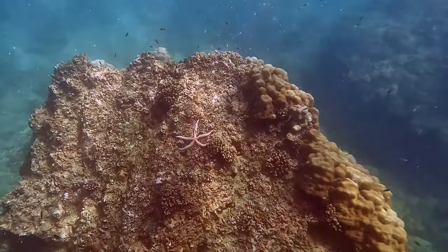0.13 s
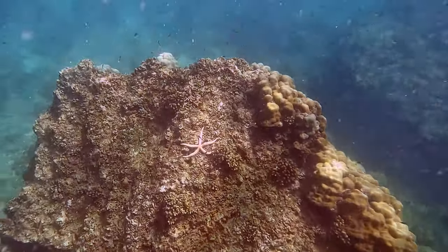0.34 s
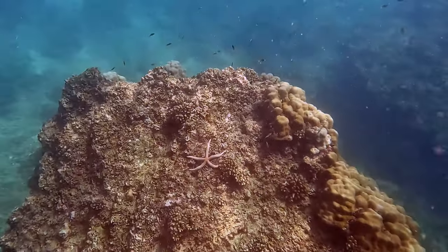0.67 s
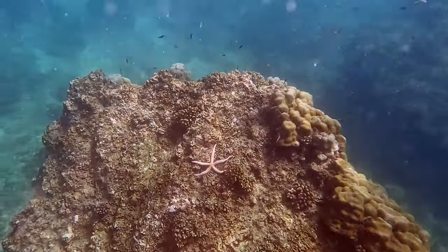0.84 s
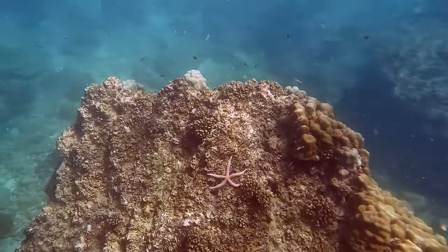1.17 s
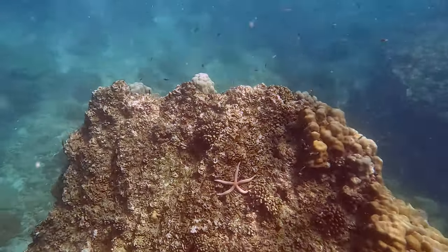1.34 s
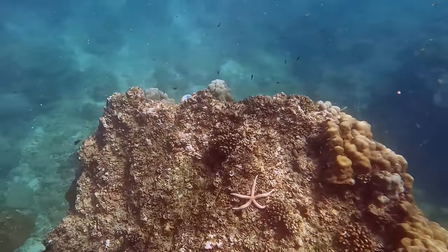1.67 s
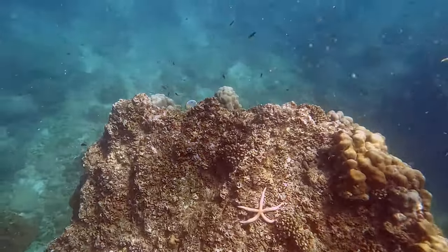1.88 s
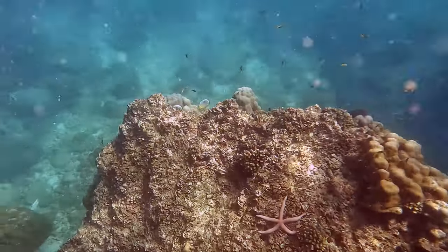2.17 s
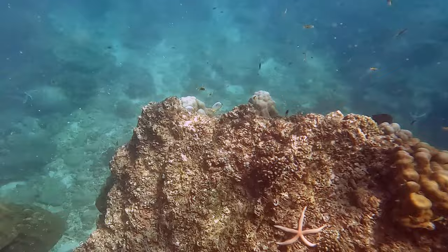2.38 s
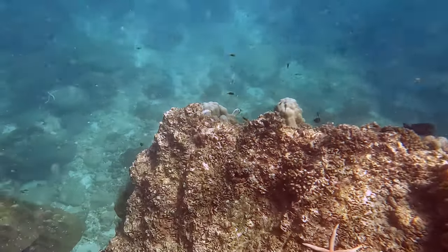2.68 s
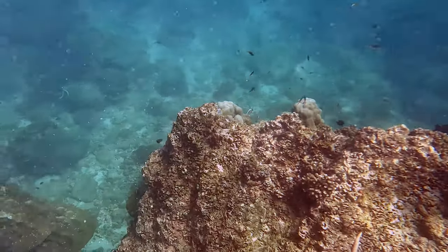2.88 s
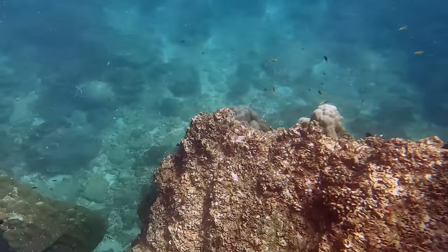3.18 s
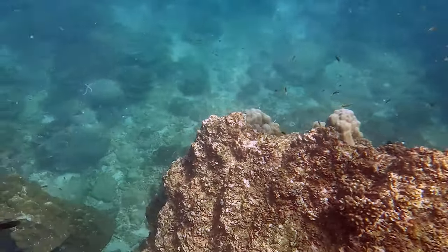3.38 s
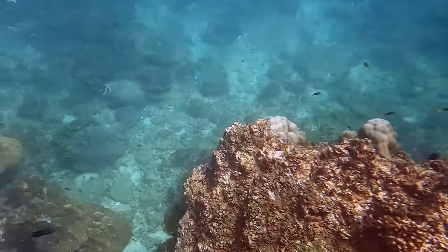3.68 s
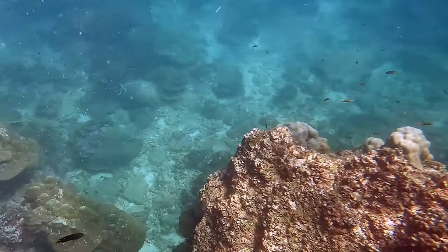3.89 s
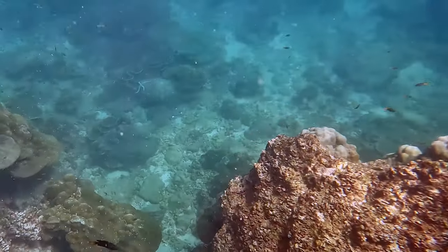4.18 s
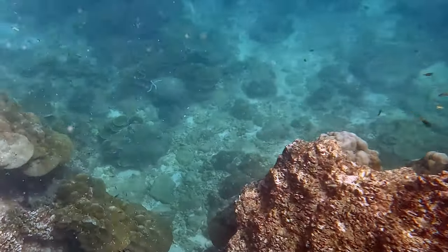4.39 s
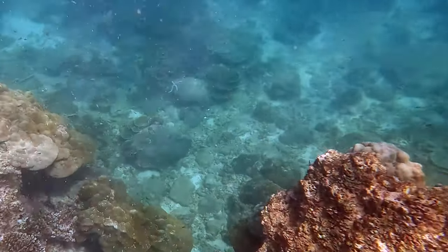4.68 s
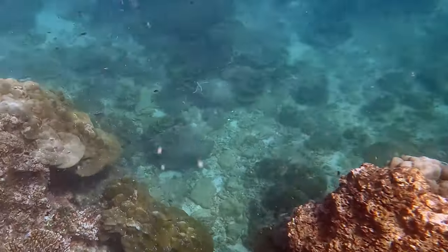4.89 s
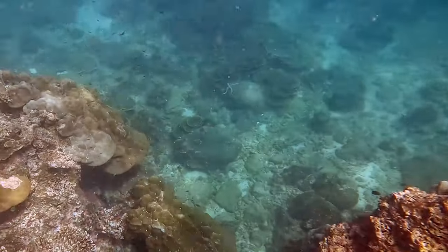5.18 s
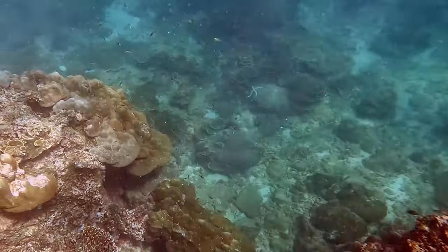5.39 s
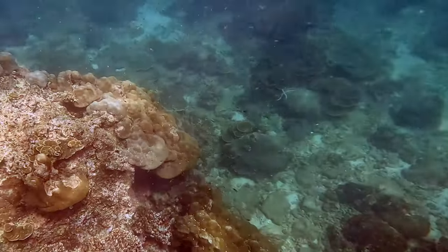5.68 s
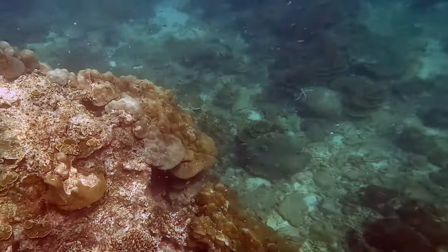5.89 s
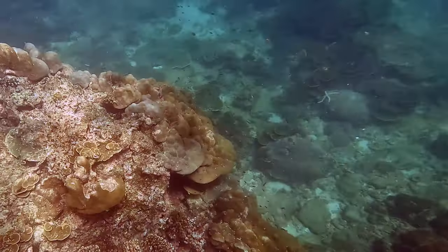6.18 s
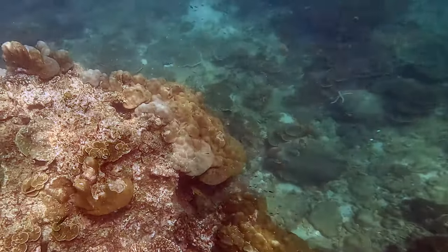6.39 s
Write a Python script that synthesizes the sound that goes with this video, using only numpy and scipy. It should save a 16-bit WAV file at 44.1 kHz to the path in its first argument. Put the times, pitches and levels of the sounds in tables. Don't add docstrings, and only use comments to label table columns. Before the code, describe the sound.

Beneath the surface over a shallow reef, a low muffled wash of water presses and gurgles unevenly. Trapped air pockets give short, hollow bloops. Across everything runs a fine, continuous crackle of distant snapping shrimp, with irregular sharper clicks close to the microphone, the strongest around two, four and just after six seconds. The sealed housing makes the water boxy and dull.

```python
import sys
import numpy as np
from scipy import signal
from scipy.fft import rfft, irfft
from scipy.io import wavfile
from scipy.ndimage import uniform_filter1d, minimum_filter1d

SR = 44100
rng = np.random.default_rng(int(sys.argv[2]) if len(sys.argv) > 2 else 0)


def unload_wav(signal):
    wavfile.write(
        sys.argv[1],
        SR,
        np.round(np.clip(np.atleast_2d(signal).T, -1, 1) * 32767).astype(np.int16),
    )


def ratio_of_db(decibels):
    return 10 ** (np.asarray(decibels, float) / 20)


N = 288414

# (frequency [Hz], colour [dB])
SHELL_LOW = [(9, -23), (18, 3.5), (39, -8.5), (56, -14.5), (110, -47), (165, -23.5), (250, -15), (290, -18),
             (351, -25), (478, -7.5), (550, -20), (606, -21), (670, -36.5)]
DEEP_THUD_DB, FULL_THUD_DB, THIN_THUD_DB = -1.5, -9.5, -16.5


def evened(x):
    return x / np.sqrt(np.mean(x ** 2) + 1e-20)


def levelled(x, size):
    return x / np.sqrt(uniform_filter1d(x ** 2, size) + 1e-20)


def lumpy(size):
    return evened(uniform_filter1d(rng.standard_normal(N), size))


def read_curve(points, hz):
    point_hz, value = np.transpose(points)
    return np.interp(np.log(hz + 1), np.log(point_hz + 1), value)


def follow(rows):
    seconds, db = np.transpose(rows)
    return ratio_of_db(np.interp(np.arange(N) / SR, seconds, db))


def add(mix, s, sound):
    part = mix[max(round(s * SR), 0):][:len(sound)]
    part += sound[:len(part)]


def scatter(sounds, per_s, scatter_db, cap):
    out = np.zeros(N)
    for when, which, size in rng.random((round(per_s * N / SR), 3)):
        gain = ratio_of_db(scatter_db * min(-np.log(size), cap))
        add(out, when * N / SR, gain * sounds[int(which * len(sounds))])
    return out


def band(x, lo_hz, hi_hz, order=2):
    return signal.sosfilt(signal.butter(order, [lo_hz, hi_hz], "bandpass", fs=SR, output="sos"), x)


def shaped(x, gain):
    return irfft(rfft(x) * gain(np.fft.rfftfreq(x.shape[-1], 1 / SR)), x.shape[-1])


def through_shell(x, ring):
    return signal.oaconvolve(x, ring)[:N]


def shell_ring(size=4096):
    # (frequency [Hz], colour [dB])
    shell_high = [(380, -47), (650, 1.5), (1040, -3), (1440, -3), (2100, -9.5), (2650, -3.5), (4000, -6),
                  (5870, 1), (7500, -1), (8100, -15), (9300, -16.5), (9750, -23), (12600, -21.5),
                  (13300, -31.5), (15600, -36)]
    # (frequency [Hz], width [Hz], depth [dB])
    notches = [(700, 50, -14), (880, 70, -8), (1160, 80, -15), (2380, 130, -5), (2870, 170, -7),
               (4700, 420, -11), (5350, 220, -6), (6650, 400, -5)]
    hz = abs(np.fft.fftfreq(size, 1 / SR))
    db = read_curve(shell_high, hz)
    for notch_hz, width_hz, depth_db in notches:
        db = db + depth_db / (1 + (2 * (hz - notch_hz) / width_hz) ** 2)
    log_gain = np.log(ratio_of_db(np.maximum(db, -100)))
    return np.fft.ifft(np.exp(np.conj(signal.hilbert(log_gain)))).real[:size // 2]


def surge():
    # (time [s], level [dB])
    swell = [(0.0, -32), (0.84, -33), (1.6, -33), (1.77, -26.5), (1.95, -39), (2.09, -24.5), (2.6, -26.5),
             (2.68, -32.5), (3.57, -37), (3.86, -29.5), (4.35, -38.5), (4.68, -34.5), (4.81, -42),
             (4.84, -32), (5.25, -35.5), (5.3, -30.5), (6.39, -32), (6.54, -29.5)]
    push = shaped(rng.standard_normal(N), lambda hz: ratio_of_db(read_curve(SHELL_LOW, hz)) * (hz < 130))
    lumps = ratio_of_db(0.89 * lumpy(4000))
    return follow(swell) * lumps * levelled(push, size=7000)


def pocket(hz, ms, glide, rise_ms=2.77, tail_db=-11):
    t = np.arange(round(SR * ms * .004)) / SR * 1000
    after = ratio_of_db(tail_db) * np.cos(np.pi / 2 * t / t[-1]) ** 2
    shape = (1 - np.exp(-(t / rise_ms) ** 2)) * (np.exp(-(t / ms) ** 3) + after)
    return shape / shape.max() * np.sin(2 * np.pi * hz * (t + glide * t ** 2 / ms) / 1000)


def pocket_choir(pitches_hz, least_cycles, most_cycles, glide):
    cycles = rng.uniform(least_cycles, most_cycles, len(pitches_hz))
    return [pocket(hz, 1000 * c / hz, glide) for hz, c in zip(pitches_hz, cycles)]


def churn(wash_db=-8, count=40):
    # (time [s], level [dB])
    stirring = [(0.0, -40.5), (0.13, -38), (0.38, -37.5), (0.49, -42), (0.8, -44.5), (1.08, -43.5),
                (1.36, -46.5), (1.48, -39), (2.3, -40.5), (2.75, -41), (3.19, -43.5), (4.06, -36.5),
                (4.46, -43), (4.86, -38), (5.5, -40), (5.94, -42.5), (6.21, -40), (6.54, -42.5)]
    deep_db, low_db, upper_db, lumps_db = -11, -7.5, -3.5, 2.5
    tones = pocket_choir(np.linspace(120, 650, count), 1.46, 8.8, glide=0.027)
    gurgle = scatter([x / np.linalg.norm(x) for x in tones], per_s=220, scatter_db=-3.5, cap=0.79)
    wash = band(rng.standard_normal(N), 154, 625)
    stirred = evened(gurgle) + ratio_of_db(wash_db) * evened(wash)
    water = shaped(stirred, lambda hz: ratio_of_db(read_curve(SHELL_LOW, hz)) * (hz > 95))
    low = shaped(water, lambda hz: 1 / (1 + (hz / 350) ** 12))
    deep = shaped(water, lambda hz: 1 / (1 + (hz / 225) ** 12))
    shared, own = uniform_filter1d(rng.standard_normal((2, N)), size=3000)
    layers = [(deep, deep_db, shared), (low - deep, low_db, shared), (water - low, upper_db, shared + own)]
    out = np.zeros(N)
    for layer, db, lumps in layers:
        out += ratio_of_db(db + lumps_db * evened(lumps)) * levelled(layer, size=3000)
    return follow(stirring) * out


def fizz(ring, level_db=-62, count=30):
    tones = pocket_choir(np.geomspace(720, 2000, count), 8.6, 29.5, glide=0.031)
    chirps = scatter(tones, per_s=60, scatter_db=6.0, cap=1.76)
    return ratio_of_db(level_db) * evened(through_shell(chirps, ring))


def draws(count):
    return np.stack([rng.random((count, 900)), rng.standard_normal((count, 900))], 1)


def spike(draw, tail_db=-33):
    place, noise = draw
    ms = np.arange(900) / SR * 1000
    bounces = .75 * (place < .05) * np.sign(noise) * np.exp(-(ms / 1.6) ** 2) * (ms > .5)
    bounces[[0, 14]] = -.3, 1
    return bounces + ratio_of_db(tail_db) * noise * np.exp(-ms / 9) * np.minimum(ms, 1)


def crackle(ring, count=40):
    crackle_db, hiss_db = -50.5, -50
    ticks = []
    for draw, hz in zip(draws(count), np.geomspace(1300, 11000, count)):
        tint = band(spike(draw, -29.5)[::rng.choice([-1, 1])], hz * 0.82, hz * 1.14)
        tick = spike(draw) * .12 + tint
        ticks.append(tick * (hz / 5000) ** 0.32 / np.linalg.norm(tick))
    far = through_shell(scatter(ticks, per_s=450, scatter_db=6.0, cap=2.46), ring)
    flicker = ratio_of_db(3.66 * lumpy(500))
    hiss = through_shell(flicker * rng.standard_normal(N), ring)
    return ratio_of_db(crackle_db) * evened(far) + ratio_of_db(hiss_db) * evened(hiss)


def bubbles(rows):
    out = np.zeros(N)
    for (s, hz, db, ms), glide in zip(rows, rng.normal(0.0012, 0.0105, len(rows))):
        add(out, s - .002, ratio_of_db(db) * pocket(hz, ms, glide, tail_db=-11 if hz < 700 else -24))
    return out


def clear_pockets():
    # (time [s], pitch [Hz], peak [dB], length [ms])
    large = [(0.001, 246, -28, 55), (0.181, 256, -26.5, 28), (0.3, 175, -32, 32), (0.328, 277, -31, 48),
             (0.456, 255, -28.5, 23), (0.516, 255, -31, 27), (1.441, 176.4, -33.5, 43),
             (1.625, 179, -31.5, 26), (1.794, 328, -27, 3.5), (2.275, 224, -30, 16), (2.576, 244, -29, 20),
             (2.655, 266, -28.5, 19), (2.71, 255, -28.5, 20), (2.951, 245, -30.5, 15),
             (3.195, 247, -28.5, 13), (3.477, 311, -31, 31), (3.581, 194, -29, 17), (4.038, 300, -37, 18),
             (4.078, 276, -20, 30), (4.304, 273, -30.5, 12), (4.644, 370, -23.5, 3.4),
             (4.759, 204, -28, 30), (5.197, 228, -26.5, 20), (5.321, 242, -31.5, 38), (5.359, 242, -37, 29),
             (5.457, 229, -25, 18.5), (5.537, 243, -25.5, 29), (5.602, 182, -24, 28), (5.605, 290, -27, 40),
             (6.166, 218, -31.5, 20)]
    middle = [(0.115, 411, -28, 7.6), (0.427, 530, -27.5, 9.1), (0.687, 548, -33, 14.6),
              (0.99, 564, -38, 20), (1.085, 570, -35.5, 16.5), (2.451, 502, -35, 18),
              (3.635, 489, -33.5, 23), (1.421, 482, -26, 19), (1.65, 563, -25, 12), (1.69, 426, -32, 8.7),
              (1.74, 487, -28.5, 13), (1.941, 486, -18, 32.4), (2.168, 465, -24, 23), (2.566, 492, -29, 38),
              (2.835, 451, -31.5, 18), (3.034, 476, -25.5, 17.4), (3.799, 458, -22, 14.4),
              (4.076, 478, -30.5, 46), (4.09, 376, -30.5, 43), (4.145, 478, -31, 35),
              (4.694, 506, -29.5, 22), (4.908, 470, -27, 9.6), (4.923, 474, -34.5, 103),
              (5.03, 432, -26, 9.4), (5.084, 426, -28.5, 36), (5.209, 465.6, -28, 46),
              (5.264, 495, -30.5, 51), (5.32, 453, -32, 22), (5.368, 565, -22.5, 9.2),
              (6.523, 447, -28, 16)]
    small = [(0.045, 795, -41.5, 10.4), (0.69, 1025, -47, 11), (1.246, 1050, -47, 19),
             (1.41, 1760, -41.5, 9.6), (1.598, 1250, -44, 14), (1.808, 758, -45.5, 19),
             (2.39, 1450, -42, 14), (2.935, 1070, -45.5, 24), (3.594, 744, -41, 14), (3.81, 800, -34, 2.8),
             (4.14, 1580, -44, 19), (4.691, 890, -41, 5), (5.03, 1033, -46, 25), (5.353, 810, -35, 5.3),
             (1.952, 1256, -37.5, 15), (4.438, 1265, -39, 14), (5.319, 995, -33.5, 12.6),
             (6.151, 986, -36, 15), (6.292, 1276, -45, 43)]
    return bubbles([*large, *middle, *small])


def favoured(x, lo_hz, place, boost=2.07, sharpness=7):
    return x + boost * signal.lfilter(*signal.iirpeak(lo_hz * 1.654 ** (0.13 + place), sharpness, SR), x)


def snaps(ring, *kinds):
    regions_hz = [1000, 2380, 4650, 8300, 16000]
    faint_edge_db = -18.5
    parts = [band(ring, lo, hi, order=3)[:700] for lo, hi in zip(regions_hz, regions_hz[1:])]
    out = np.zeros(N)
    for rows, thud_db in kinds:
        for (s, energy_db, body_db, *edge_db), draw in zip(rows, draws(len(rows))):
            top_db = edge_db[0] if edge_db else faint_edge_db
            shares_db = energy_db - 2.5 + np.array([body_db + thud_db, body_db, 0, top_db])
            snap = 0
            for k, (part, lo_hz, db) in enumerate(zip(parts, regions_hz, shares_db)):
                rung = np.convolve(spike(np.roll(draw, 200 * k, axis=1)), part)
                rung = favoured(rung, lo_hz, place=draw[0, k])
                snap = snap + ratio_of_db(db) * rung / np.linalg.norm(rung[:150])
            add(out, s - .0005, snap)
    return out


def faint_snaps(ring):
    # (time [s], energy [dB], body [dB re energy])
    deep = [(0.018, -14, -9), (0.6453, -15.5, -7), (0.6897, -16, -15), (0.8208, -15, -10),
            (1.1893, -16, -6.5), (1.5045, -19.5, 1), (1.5822, -15, -10), (1.7817, -16.5, -3.5),
            (1.8017, -20, 0), (1.9131, -21, -8), (1.991, -15, -8), (2.0889, -17, -6), (2.3136, -15, -5),
            (2.6941, -21.5, -0.5), (3.909, -22, 2), (2.8235, -13.5, -8), (2.9718, -14.5, -5),
            (3.4167, -16, -3), (5.581, -18, -7), (3.488, -11.5, -11), (4.1285, -23, 4), (4.8685, -15, -13),
            (5.0145, -18.5, -3), (5.3331, -20.5, 1), (5.5583, -18, 0), (5.7087, -24.5, 6.5),
            (6.1168, -18, -1), (6.1633, -14.5, -5.5), (5.7983, -15, -10), (5.9086, -14, -6),
            (5.9805, -10.5, -24), (6.5002, -14, -13), (4.8185, -22, 5), (0.7131, -25, 1), (5.7553, -21, -2)]
    thin = [(0.7634, -20, -12), (0.3263, -12.5, -5), (0.3469, -15, -3), (2.0223, -15.5, -11),
            (0.428, -21, -3), (0.5844, -19, -2), (0.6608, -23.5, 3), (0.836, -14, -14), (0.9706, -19, -17),
            (1.2197, -15, -9), (1.3362, -21, -22), (1.4349, -16, -0.5), (1.714, -14, -20),
            (2.1482, -16, -12), (1.827, -15, -10), (1.852, -16.5, -4), (1.93, -22, -2), (2.1291, -21, 5),
            (2.175, -18, -6), (2.2938, -20, -18), (2.4512, -14, -11), (6.3055, -18, -10),
            (2.5478, -16, -24), (2.605, -20, -19), (2.6128, -11.5, -9), (2.6276, -18.5, 4.5),
            (2.9915, -27.5, -11), (3.0366, -15, -2), (3.1229, -20, -7), (3.1481, -17, -1.5),
            (3.1959, -11, -19), (3.4316, -13, -6), (3.4594, -17, -1), (3.4917, -19, -16),
            (3.6041, -13.5, -6), (3.6266, -17, -3), (3.7032, -14.5, -13), (3.7325, -14, -11),
            (3.7401, -19, -18), (3.8142, -11, -14), (3.8529, -16, -4), (4.0156, -13, -14.5),
            (4.2714, -19, -8), (4.449, -15.5, -8), (4.4822, -17, 1), (4.5515, -16.5, -7), (4.709, -18, -16),
            (4.7768, -14.5, -7), (4.962, -14, -8), (4.9922, -16, -3), (6.5287, -15, -10), (5.1111, -14, -8),
            (5.1292, -19, -1), (5.1507, -18.5, -3), (5.2417, -15.5, -3), (5.3904, -13, -7),
            (5.4464, -16, -1.5), (5.5533, -14, -8), (5.5934, -18, -18), (5.602, -18, 0)]
    return snaps(ring, (deep, DEEP_THUD_DB), (thin, THIN_THUD_DB))


def faint_pockets():
    # (time [s], pitch [Hz], peak [dB], length [ms])
    low = [(0.217, 158, -38.5, 47), (2.21, 234, -31, 15), (0.81, 190, -38, 48), (1.056, 600, -35, 7.4),
           (1.48, 368, -37.5, 36), (1.3, 383, -29, 6.1), (1.887, 177, -35.5, 33), (1.899, 337, -30.5, 8.2),
           (2.7, 366, -35, 4.7), (2.436, 230, -31.5, 23), (2.592, 249.5, -34, 40), (3.7, 280, -43, 16),
           (2.5, 288, -32, 14), (2.976, 280, -30, 7.0), (3.158, 334, -35, 9.9), (3.891, 167, -34.5, 24),
           (6.5, 312, -26, 7.1), (4.1, 250, -30, 49), (2.7, 376, -31, 14), (4.482, 253, -31, 11),
           (4, 280, -27, 6.9), (4.664, 480, -28, 9), (5.4, 441, -28, 10), (3.1, 310, -35, 7.0),
           (3.8, 431, -29.5, 6.1), (6.8, 240, -28, 9.1), (5.663, 170, -33.5, 29), (6.7, 548, -27.5, 7.3),
           (10, 575, -34.5, 20), (6.9, 485, -30.5, 64), (5.753, 260, -29.5, 11), (5.75, 475, -32, 19),
           (3.9, 410, -28.5, 13), (2.498, 470, -30.5, 12), (2.14, 520, -32, 12), (5.965, 437, -28, 7.4),
           (0.168, 465, -29, 8.9)]
    high = [(0.026, 1400, -44, 7.4), (1.896, 1852, -44, 8.7), (1.907, 1280, -43, 8.6),
            (3.613, 1420, -43.5, 8.2), (4.864, 1610, -45, 12), (5.371, 960, -33, 4.3)]
    return bubbles([*low, *high])


def near_snaps(ring):
    # (time [s], energy [dB], body [dB re energy], edge [dB re energy])
    deep = [(1.029, -16, 4, -13), (1.4415, -4.5, -14.5, -19), (1.4763, -15, -7, -25),
            (1.7968, -12.5, -11, -27), (1.8732, -26.5, 10, 0), (2.1558, -13.5, 7.5, -20),
            (2.306, -11.5, -2.5, -16), (2.3466, -8, -1.5, -20), (2.3649, -6.5, -14, -16),
            (2.5629, -14, -1, -25), (2.659, -23, 7, -1), (3.2675, -13.5, -8, -17), (3.394, -8, -5, -32),
            (3.51, -24, 8, -1), (3.8281, -11.5, -12, -17), (3.915, -9.5, -1.5, -8),
            (4.0926, -10.5, -5, -20), (4.398, -8, -9.5, -29), (4.4107, -11.5, -6, -23),
            (4.849, -8.5, -10.5, -11), (4.8896, -10.5, 2, -16), (4.9775, -8, -12, -23),
            (5.3735, -11, 0.5, -14), (5.6188, -9, -4, -25), (5.921, -16.5, 4.5, -25),
            (5.9618, -12, -7, -25), (6.2868, -26, 10.5, -19), (6.2983, -12.5, -3, -9),
            (6.3502, -5.5, -12, -23)]
    full = [(0.06, -7, -9.5, -18), (0.2228, -7.5, 0, -18), (0.334, -10, -2, -14), (0.5084, -16, 0.5, -7),
            (0.5333, -10.5, -1, -13), (0.8, -24, 8, -3), (0.8926, -18.5, 6, -9), (1.0667, -12.5, -3.5, -11),
            (1.3567, -9.5, 0, -16), (1.3834, -14, 4.5, -18), (1.4675, -9.5, -3, -20),
            (1.7014, -11, -1, -24), (1.9975, 1, -0.5, -15), (2.162, -4.5, -23, -14), (2.7857, -7, -9, -20),
            (2.9207, -12, -5.5, -24), (3.2878, 0.5, -12.5, -17.5), (3.619, -12.5, -9, -14),
            (3.6477, -8, -8.5, -26), (3.7555, -4, -1.5, -28), (3.888, -12.5, -4.5, -22),
            (3.9644, 3, -14, -14.5), (4.028, -11, -10, -26), (4.1047, -7.5, -7, -13),
            (4.1671, -11, -1.5, -18), (4.2067, -19.5, 5, -19.5), (6.026, -14, 3, -17),
            (6.0874, -8.5, 4, -9), (6.3153, -2.5, 1.5, -28), (6.3554, 4, -10.5, -35)]
    thin = [(0.1868, -9.5, -11, -26), (0.2553, -5.5, -2, -14), (0.8418, -6, -9.5, -26),
            (1.2992, -10.5, -1.5, -29), (1.542, -11.5, -8, -17), (1.567, -12.5, -15, -8),
            (2.1408, -11.5, -7, -27), (2.1972, -11.5, 5, -26), (2.4717, -8.5, -2, -28),
            (2.4832, -3.5, -14, -25), (2.498, -4.5, -12, -16), (2.6688, -13, -8, -20),
            (2.7528, -9.5, -29, -24), (2.8779, -14.5, -0.5, -16), (2.9983, -10.5, -5.5, -15),
            (3.051, -9.5, -17, -16), (3.088, -13, -20, -18), (3.4722, -12.5, -14, -7),
            (3.7733, -13, -20, -16), (4.0519, -10.5, -19, -27), (4.2922, -9, -28, -14),
            (4.5662, -12, -23, -9), (4.7487, -10.5, -24, -12), (5.166, -13, -10, -8),
            (5.2212, -4.5, -12, -18), (5.4854, -12.5, -5, -30), (5.767, -17.5, 3, -16),
            (5.8222, -13, 1, -21), (6.1996, -13.5, -3, -14), (6.2488, -9.5, -11, -7),
            (4.6256, -15.5, -23, -10)]
    return snaps(ring, (deep, DEEP_THUD_DB), (full, FULL_THUD_DB), (thin, THIN_THUD_DB))


def microphones(x):
    # (frequency [Hz], left-right [dB], left leads by [radians], likeness [0-1])
    ports = [(50, -.8, .06, 1), (300, -.3, .26, 1), (560, 1.3, .08, 1), (760, -5, -1, .7),
             (1020, -2.4, .43, .85), (1250, 5, .1, .9), (1500, 1.2, -.9, .9), (1900, 3, -.3, .8),
             (2750, 2.7, -1.4, .7), (3000, -6, .9, .6), (3600, -3.7, .1, .94), (6000, -1.6, 0, .97),
             (9000, .1, 0, .9), (12500, 1.8, 0, .6)]
    hz, lean_db, lead, same = np.transpose(ports)

    def fixed_side(f):
        ratio = ratio_of_db(read_curve(np.c_[hz, lean_db], f)) * np.exp(1j * read_curve(np.c_[hz, lead], f))
        return (ratio - 1) / (ratio + 1)

    def moving_side(f):
        return np.sqrt(1 - read_curve(np.c_[hz, same], f)) * 0.43 * (f > 600)

    direction = lumpy(400)
    side = shaped(x, fixed_side) + shaped(direction * x, moving_side)
    return np.array([x + side, x - side])


def starved(x, from_hz=13000, keep_db=-6.0, hungry=.8, click_db=12.0, holes=0.59):
    ceiling_hz, ceiling_step_hz = 15830, 690
    hz, _, z = signal.stft(x, SR, nperseg=1024)
    frames = z.shape[2]
    bin_hz = hz[:, None]
    power = uniform_filter1d((abs(z) ** 2).sum(0), size=16, axis=0)[8::16].repeat(16, axis=0)
    floor_db = keep_db + .6 * (bin_hz[:512] - from_hz) / 1000
    usual = np.median(power, 1, keepdims=True) * ratio_of_db(floor_db) ** 2
    z[:, :512] *= (power > usual) | (bin_hz[:512] < from_hz)
    steps = np.floor(hungry * rng.exponential(1, frames)).repeat(2)[:frames]
    patches = evened(uniform_filter1d(rng.standard_normal((frames, 65)), size=4, axis=0))
    patches = patches.repeat(8, axis=1).T[:513]
    top = power[hz[:512] > 4000].sum(0)
    lifted = top > np.median(top) * ratio_of_db(click_db) ** 2
    after_click = np.roll(lifted, 2) | np.roll(lifted, 3)
    ceiling = np.where(after_click, from_hz, ceiling_hz - ceiling_step_hz * steps)
    z *= lifted | (bin_hz < from_hz) | ((bin_hz < ceiling) & (patches < holes))
    mono = (bin_hz > 6500) & (bin_hz < 10500) & (patches > .1)
    z = np.where(mono, z.mean(0), z)
    return signal.istft(z, SR, nperseg=1024)[1][:, :N]


def pinched(x, click_db=18.0, under_db=-48.0):
    hz, _, z = signal.stft(x, SR, nperseg=256)
    power = uniform_filter1d((abs(z) ** 2).sum(0), size=8, axis=0)
    loud = power[hz > 3000].max(0)
    near = -minimum_filter1d(-loud, size=9)
    drop = (near > np.median(loud) * ratio_of_db(click_db) ** 2) & (power < near * ratio_of_db(under_db) ** 2)
    return signal.istft(z * ~(drop & (hz[:, None] > 8800)), SR, nperseg=256)[1][:, :N]


def scene():
    ring = shell_ring()
    water = surge() + churn() + fizz(ring)
    pockets = clear_pockets() + faint_pockets()
    shrimp = crackle(ring) + faint_snaps(ring) + near_snaps(ring)
    return microphones(water + pockets + shrimp)


def top_cut(x):
    return signal.sosfilt(signal.butter(12, 16510, fs=SR, output="sos"), x)


def record(dry):
    edge_hz = 16600
    limited = signal.oaconvolve(dry, signal.firwin(301, edge_hz, fs=SR)[None], "same")
    mix = pinched(starved(limited))
    return top_cut(mix)


dry = scene()
out = record(dry)
unload_wav(out)
```